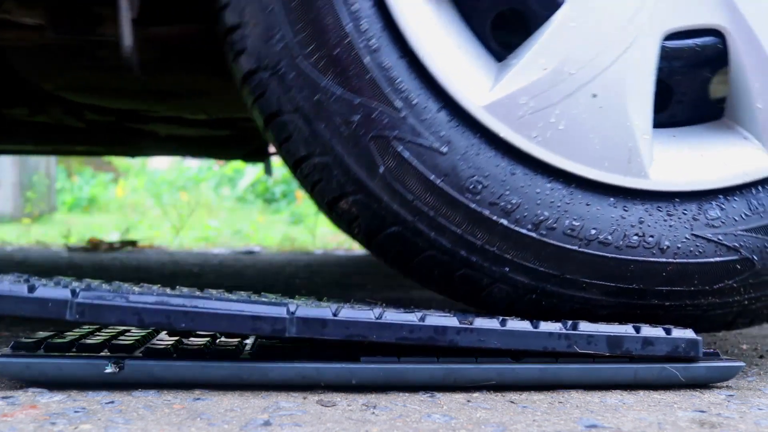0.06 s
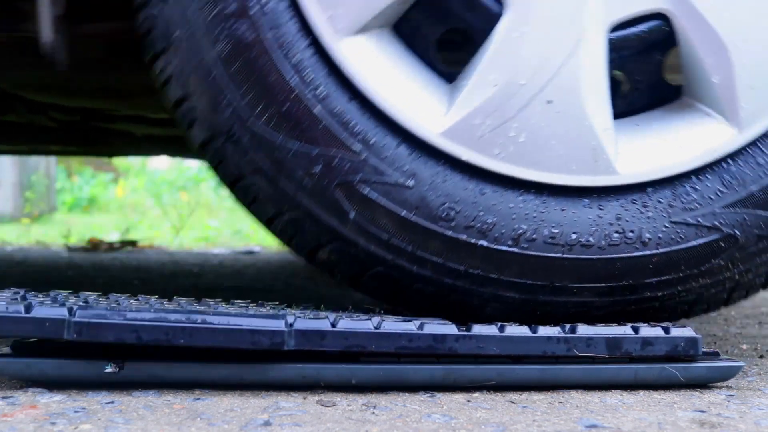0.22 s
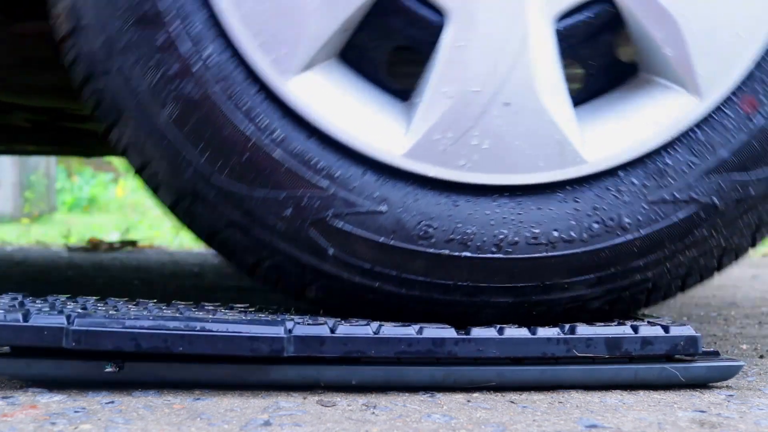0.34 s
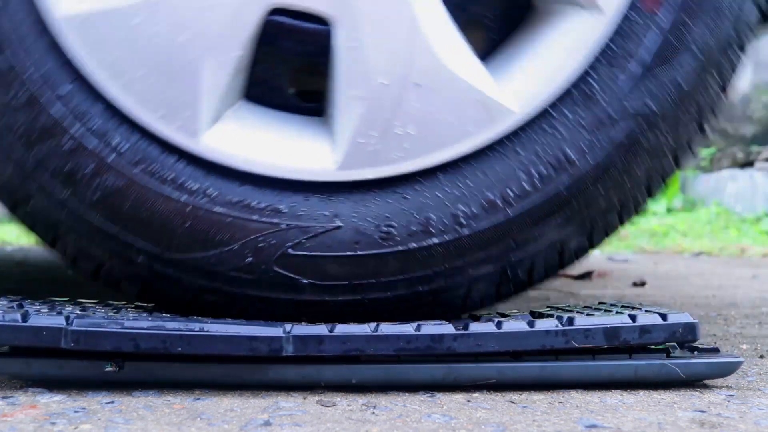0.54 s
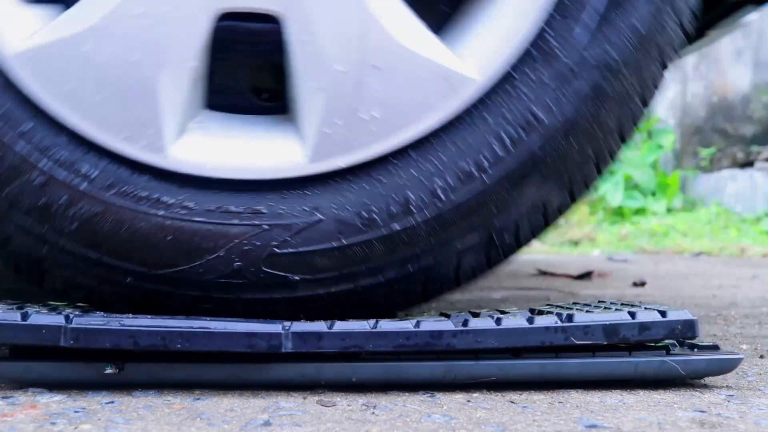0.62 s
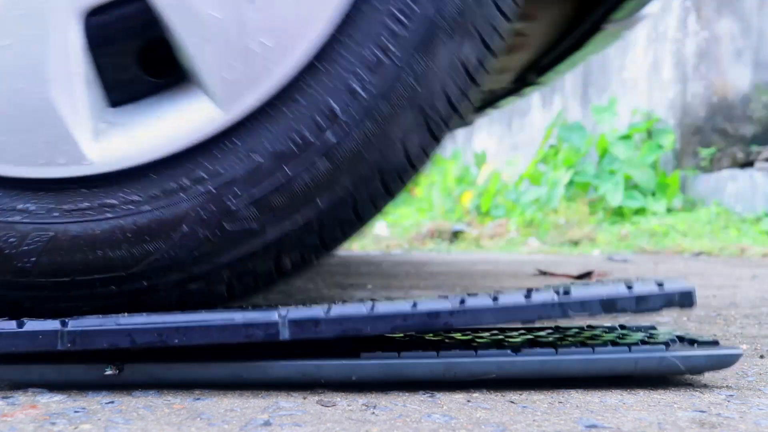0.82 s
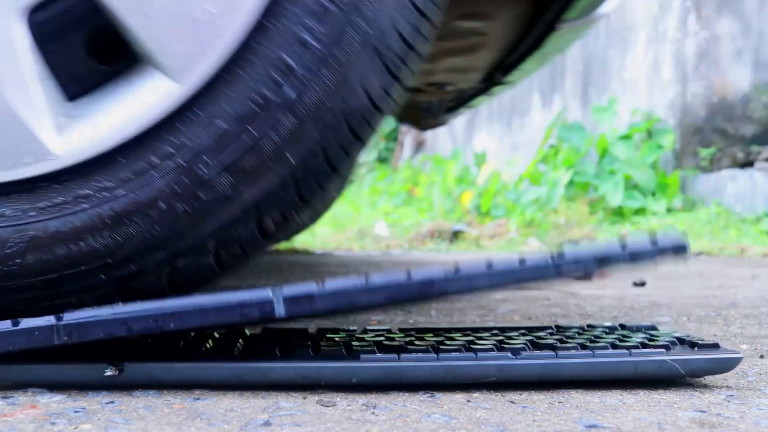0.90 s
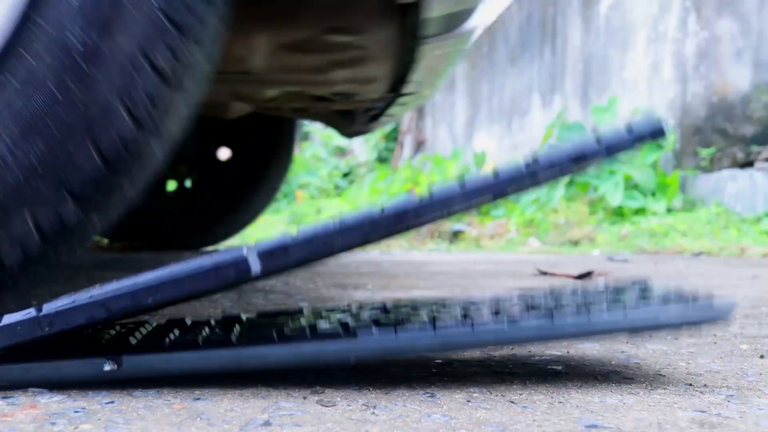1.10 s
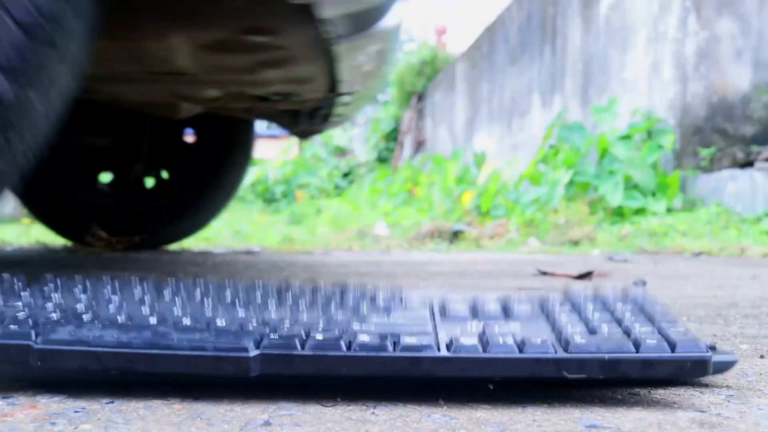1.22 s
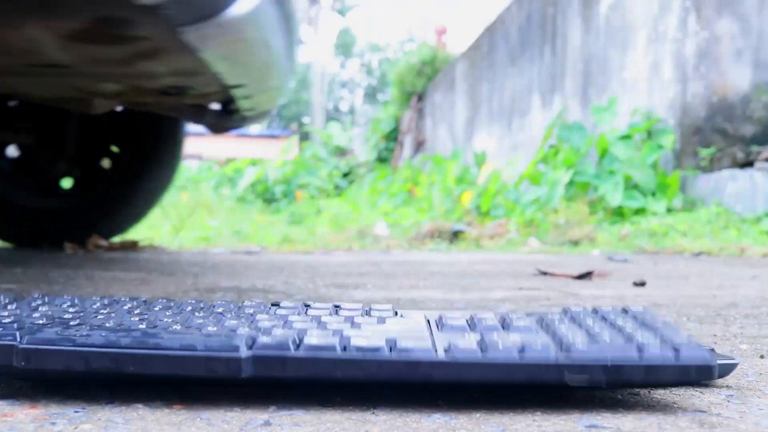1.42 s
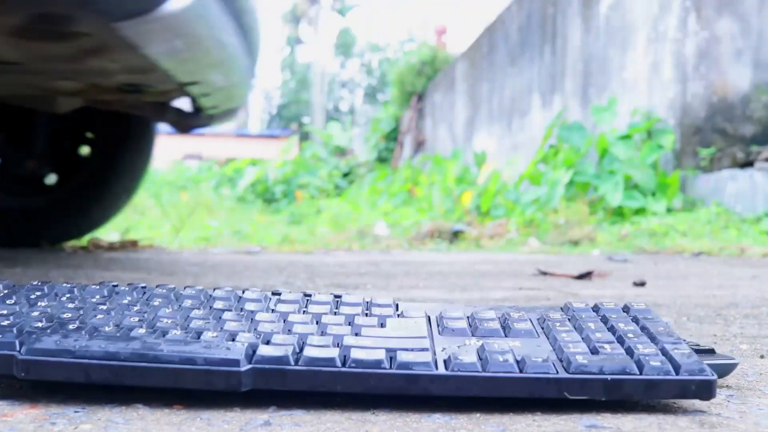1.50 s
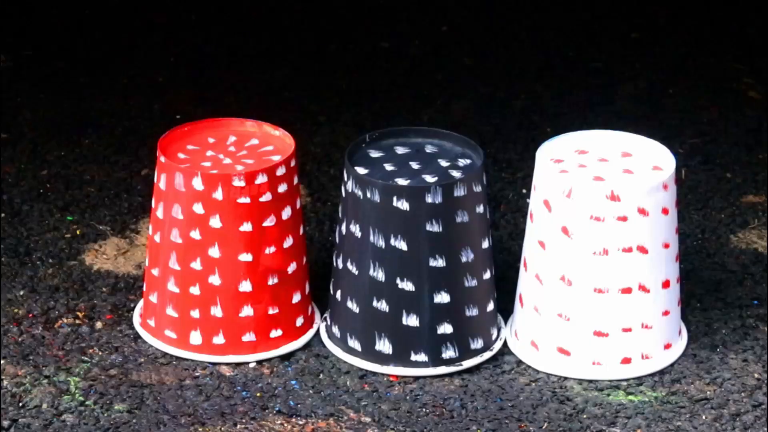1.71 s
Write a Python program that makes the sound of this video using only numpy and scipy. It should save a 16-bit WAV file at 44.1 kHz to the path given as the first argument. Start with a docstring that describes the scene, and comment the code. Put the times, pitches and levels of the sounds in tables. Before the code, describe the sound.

A plastic keyboard cracks under a car tyre, close by, over a low engine hum and rumble. Light ticks give way at about 0.2 seconds to sharp, dense snaps and fine crackle, lasting until 1.1 seconds. After a brief lull, the loose case slaps down around 1.3 seconds and rattles in weaker bounces until 1.6. A soft, dull bump follows near 1.7 seconds.

```python
"""Keyboard crushed under a tyre

A car rolls slowly over a plastic keyboard on concrete, close to the microphone. Keys and clips fracture
over a bed of fine crackle, each impulse exciting the damped modes of the case; the case lifts, slaps
back down and rattles. The engine hums underneath, and the underbody and yard reflect each crack.
The loudest cracks overload, and the sound drops out briefly near the end."""
import sys
import numpy as np
from scipy import signal
from scipy.fft import rfft, irfft
from scipy.io import wavfile
from scipy.ndimage import uniform_filter1d

SR = 44100
rng = np.random.default_rng(int(sys.argv[2]) if len(sys.argv) > 2 else 0)


def put_to_file(sound):
    """Save the sound as 16-bit audio at rate SR, in the file named by the first command-line argument."""
    columns = np.atleast_2d(sound).T  # one column per channel
    safe = np.clip(columns, -1, 1)
    whole_steps = np.round(safe * 32767)
    wavfile.write(sys.argv[1], SR, whole_steps.astype(np.int16))


N = 77175
T = np.arange(N) / SR

# fractures: (time [s], crack [dB], case knock [dB], bright edge [dB], pitch of the broken piece [Hz])
FRACTURES = [(0.0622, -33.5, -50, -31.5, 3600), (0.0798, -35.5, -46, -34, 3300),
             (0.1817, -26.5, -30.5, -26, 3200), (0.2111, -18, -30, -17, 3710),
             (0.2427, -25, -55, -26, 2950), (0.2686, -10, -23.5, -18, 2180), (0.2911, -5, -11, -17, 3260),
             (0.2988, -37, -17, -28, 3940), (0.3361, -15.5, -40, -17.5, 3500),
             (0.3422, -18, -41, -25, 3700), (0.3675, -12.5, -23, -18, 3500),
             (0.3888, -18, -30.0, -21, 3830), (0.396, -22, -27.0, -22.0, 2200),
             (0.4005, -11, -12, -15.5, 4030), (0.4615, -10, -10, -14, 1420),
             (0.4907, -8.5, -13.5, -11, 3620), (0.4955, -21.5, -26, -24, 3570),
             (0.5443, -28, -41, -26, 1900), (0.5735, -19, -29, -24.5, 1360),
             (0.5788, -17.5, -28, -15.5, 1790), (0.5837, -22, -30, -25, 1380),
             (0.5879, -18, -39.5, -24.5, 1400), (0.6046, -18.5, -38, -18, 3860),
             (0.6576, -24, -25.5, -19.5, 3220), (0.6638, -20, -49, -21.5, 3950),
             (0.6735, -14, -32.5, -10.5, 3350), (0.6868, -16.5, -30.5, -30, 1960),
             (0.6951, -26.5, -30, -25.0, 2100), (0.7089, -21, -43.0, -34, 2100),
             (0.7168, -9.5, -31, -15.5, 2100), (0.7287, -6, -27.5, -15, 2230),
             (0.7322, -14.5, -21.5, -17, 3920), (0.7698, -17.5, -36.5, -27, 4000),
             (0.7967, -12.5, -32.5, -18.5, 2650), (0.7993, -9.5, -21, -10, 2900),
             (0.8068, -12.5, -18, -30, 2650), (0.8095, -14, -29, -20, 2730),
             (0.8147, -14.5, -27, -21, 1400), (0.8198, -28, -23, -15, 2200), (0.8247, -13, -36, -33, 3960),
             (0.8317, -19, -36, -34, 1550), (0.8431, -17.5, -24.5, -17.5, 1920),
             (0.866, -12, -15, -12, 3700), (0.8759, -6, -29, -12, 3010), (0.8789, -12.5, -22.5, -24, 4020),
             (0.9232, -8, -12, -9, 2840), (0.9275, -5.5, -8, -15.5, 1440), (0.9348, -12, -24.5, -14, 2750),
             (0.9876, -23.5, -27.5, -20, 3140), (0.9996, -22, -26, -14.5, 3620),
             (1.0073, -17.0, -24, -18, 3300), (1.0348, -12, -16, -17, 3140),
             (1.0504, -7, -12.5, -10.5, 3500), (1.0761, -18, -15, -18.5, 2170),
             (1.0871, -11, -14, -15.5, 3300), (1.1733, -28, -54, -26.5, 3400),
             (1.1796, -25.5, -57.5, -30.5, 3040)]
# impacts of the loose case on its base and the ground: (time [s], clack [dB], case knock [dB],
# bright edge [dB], panel pitch [Hz], panel level [dB], rim pitch [Hz], rim level [dB])
LANDINGS = [(1.089, -15, -19, -13, 447, -14, 890, -20), (1.099, -21, -25.5, -32, 536, -19.5, 2680, -22),
            (1.278, -29, -19.5, -52, 1230, -20.5, 2720, -47),
            (1.2841, -9, -8, -19.5, 970, -14, 2504, -14.5), (1.291, -16, -19, -24, 450, -28, 1640, -18),
            (1.3311, -11.5, -28, -13.5, 1300, -23, 3200, -29),
            (1.3359, -16, -11, -23.5, 1310, -8.5, 2660, -21),
            (1.3395, -12.5, -15.5, -34, 893, -12, 1550, -18), (1.389, -36, -31, -46, 1180, -32, 2360, -37),
            (1.4036, -28.5, -28, -50, 1160, -26, 2420, -39),
            (1.454, -18.5, -21, -28.5, 490, -24, 1204, -26.5), (1.4927, -20, -23, -27, 487, -34, 1220, -27),
            (1.563, -33.5, -38.5, -58, 510, -49, 1205, -33.5)]
# low and high modes of the case: (frequency [Hz], level [dB])
KNOCK_MODES = [(285, -25.5), (452, -7.5), (560, -7), (680, -10.5), (800, -4), (900, 1.5), (1065, 1.5),
               (1250, 2)]
CLACK_MODES = [(1430, -2.5), (1700, -5), (2130, 0), (2450, 3), (2790, 0), (3250, 1), (3620, 1), (3950, 2),
               (4220, -1.5)]
# bright edge of a blow: (frequency [Hz], level [dB])
EDGE_SPECTRUM = [(3000, -20), (4400, -14.5), (5400, -2), (7600, 0.5), (12000, -9), (16000, -27)]
# crackle under the load of the tyre: (time [s], level [dB])
CRACKLE_LEVEL = [(0, -40.5), (.16, -39.5), (.39, -30.5), (.44, -35.5), (.53, -34.5), (.63, -36), (.72, -42),
                 (.78, -35.5), (.83, -25), (.91, -30), (1.02, -24.5), (1.11, -34.5), (1.18, -31),
                 (1.23, -55.5), (1.37, -53), (1.52, -41.5), (1.62, -59)]
# bearing of the tyre: (time [s], left minus right [dB])
TYRE_PAN = [(0, -11), (.3, -4), (.8, -2), (1.5, -2.5)]
# engine harmonics: (multiple of the firing rate [1], level [dB])
ENGINE_ORDERS = [(1, -52.5), (2, -41), (3, -48), (4, -48.5), (5, -58), (6, -48), (7, -46.5), (12, -51),
                 (15, -47.5)]
# envelopes of the engine and the rolling rumble: (time [s], level [dB])
ENGINE_LEVEL = [(0, 0), (.1, 2), (.28, 0), (.42, -17), (1.1, -9.5), (1.42, -6), (1.69, -13.5)]
RUMBLE_LEVEL = [(0, -38), (.2, -38.5), (.7, -37.5), (1.1, -35.5), (1.24, -39.5), (1.68, -42), (1.75, -54)]
# exhaust puff, rolling rumble and ground bump: (frequency [Hz], level [dB])
PUFF_SPECTRUM = [(50, -15), (300, -11.5), (620, 0.5), (800, -7.5), (2500, -25), (12000, -31.5)]
RUMBLE_SPECTRUM = [(20, -9.5), (45, 0.5), (75, 3), (140, -1), (290, -1.5), (420, -13), (700, -9.5),
                   (1500, -12), (4000, -26.5), (15000, -48)]
BUMP_SPECTRUM = [(25, -9), (70, -1.5), (190, -1.5), (320, -1.5), (520, -17.5), (2000, -60)]
# bumps of tyre and case on the ground: (time [s], width [s], level [dB], left minus right [dB])
BUMPS = [(0.733, 0.01, -31, 3), (1.29, 0.0015, -20, 8), (1.619, 0.025, -40.5, 18.5),
         (1.671, 0.011, -29.5, 16.5)]
# colour of the reflections: (frequency [Hz], level [dB])
ECHO_SPECTRUM = [(200, -3.5), (1000, 2), (3500, 2.5), (8000, 0), (15000, -0.5)]
# stereo width: (frequency [Hz], side relative to mid [dB])
SIDE_SPECTRUM = [(50, 0.5), (120, -9.5), (250, -14.5), (550, -16.5), (1000, -12), (2200, -5.5), (3800, -3),
                 (7500, 2.5), (14000, 0.5)]

BLOW_SAMPLES, SLIPS_PER_S = 8192, 6000
SNAP_S, SLAP_S = .00022, .0007   # time scale on which the slips of one blow swell and die
CRACK_TRIM_DB, KNOCK_TRIM_DB, EDGE_TRIM_DB = 0.5, 1.5, -1.5   # added to each fracture
PIECE_SHARE = .47   # share of a crack's energy in the broken piece
PIECE_T60_S, PANEL_T60_S = .0032, .024
KNOCK_CYCLES, CLACK_CYCLES = 12, 20   # cycles in which a mode dies by 60 dB
TYRE_DAMPING = .55   # share of the ring time left under the tyre
MODE_SCATTER_DB, MODE_DETUNE = 3, 0.012   # spread from blow to blow as the case bends
GRAINS_PER_S, GRAIN_SPREAD_DB = 780, 3.5
FIRING_HZ, FIRING_WAVER, PUFF_DB = 41.28, 0.006, -45
ECHO_DELAY_S, SIDE_LAG_S = 0.0024, .00007
DROPOUT_FROM_S, DROPOUT_TO_S, CUTOFF_HZ = 1.695, 1.737, 16600


def snaps():
    """Brittle fracture: the released energy rings the broken piece and the tyre-damped case."""
    out, jolt = np.zeros((2, N)), impulse(SNAP_S)
    for time, crack_db, knock_db, edge_db, hz in FRACTURES:
        slips = slip_burst(SNAP_S, tail_s=.0045, tail_db=-10)   # splinters rattle on
        crack_db += CRACK_TRIM_DB
        piece = unit(resonator(resonator(jolt, hz, PIECE_T60_S), hz, PIECE_T60_S))
        piece *= from_db(crack_db) * np.sqrt(PIECE_SHARE)
        clack_db = crack_db + 10 * np.log10(1 - PIECE_SHARE)
        case = case_response(slips, clack_db, knock_db + KNOCK_TRIM_DB, edge_db + EDGE_TRIM_DB,
                             TYRE_DAMPING)
        place(out, time, piece + case)
    return out


def slaps():
    """Impact excitation: the freed case lands and bounces, and its panel and rim vibrate freely."""
    out, jolt = np.zeros((2, N)), impulse(2 * SLAP_S)
    for time, clack_db, knock_db, edge_db, panel_hz, panel_db, rim_hz, rim_db in LANDINGS:
        panel = from_db(panel_db) * unit(resonator(jolt, panel_hz, PANEL_T60_S))
        rim = from_db(rim_db) * unit(resonator(jolt, rim_hz, PANEL_T60_S))
        slips = slip_burst(SLAP_S, tail_s=0.011, tail_db=-6.5)   # loose keys rattle on
        place(out, time, panel + rim + case_response(slips, clack_db, knock_db, edge_db))
    return out


def crackle():
    """Shot noise: grinding keys and grit send small random ticks through the damped case."""
    sizes = from_db(GRAIN_SPREAD_DB * np.minimum(rng.exponential(1, N), 3))
    ticks = stereo(rng.standard_normal((2, N)) * sizes * (rng.random(N) < GRAINS_PER_S / SR))
    grinding = case_response(ticks, clack_db=0, knock_db=-1.5, edge_db=-3, damping=TYRE_DAMPING)
    return unit(grinding) * np.sqrt(N) * from_db(curve(CRACKLE_LEVEL))


def slip_burst(swell_s, tail_s, tail_db):
    """Stick-slip excitation: a run of tiny slips swells, collapses and trails off."""
    t = T[:BLOW_SAMPLES]
    rise = t / (2 * swell_s)
    swell = (rise * np.exp(1 - rise)) ** 2
    tail = from_db(tail_db) * np.minimum(rise, 1) * np.exp(-t / tail_s)
    slips = rng.standard_normal((2, BLOW_SAMPLES))
    slips *= (rng.random(BLOW_SAMPLES) < SLIPS_PER_S / SR) + 0.3   # spikes over a noise floor
    return stereo(np.array([unit(channel) for channel in slips * (swell + tail)]))


def impulse(delay_s):
    """Impulse excitation: one clean jolt, its side signal slightly behind its mid."""
    pair = np.zeros((2, BLOW_SAMPLES))
    pair[0, int(delay_s * SR)] = pair[1, int((delay_s + SIDE_LAG_S) * SR)] = 1
    return stereo(pair)


def case_response(force, clack_db, knock_db, edge_db, damping=1):
    """Forced vibration: the case answers with high modes, low modes and a bright edge."""
    clack = from_db(clack_db) * modal_sum(force, CLACK_MODES, CLACK_CYCLES * damping)
    knock = from_db(knock_db) * modal_sum(force, KNOCK_MODES, KNOCK_CYCLES * damping)
    edge = from_db(edge_db) * unit(colour(force, EDGE_SPECTRUM))
    return clack + knock + edge


def modal_sum(force, modes, cycles):
    """Modal superposition: each blow lands elsewhere, so the modes vary in strength and tuning."""
    total = 0
    for k, (hz, db) in enumerate(modes):
        strength, tuning = rng.standard_normal(2)
        mode = unit(resonator(force, hz * (1 + MODE_DETUNE * tuning), t60=cycles / hz))
        total += (-1) ** k * from_db(db + MODE_SCATTER_DB * strength) * mode
    return unit(total)


def resonator(force, hz, t60):
    """Damped harmonic oscillator: one mode that falls by 60 dB in t60 seconds."""
    radius, angle = from_db(-60 / (t60 * SR)), 2 * np.pi * hz / SR
    return signal.lfilter([1, 0, -1], [1, -2 * radius * np.cos(angle), radius ** 2], force + 1e-18)


def place(out, time, blow):
    """Superposition: add a blow at the tyre's bearing, its level taken over 5 ms."""
    start = int(time * SR)
    span = out[:, start:start + BLOW_SAMPLES]
    span += (blow * np.sqrt(.005 * SR) * panned(curve(TYRE_PAN, time)))[:, :span.shape[1]]


def engine():
    """Periodic excitation: firing pulses give a harmonic throb, with an exhaust puff on each."""
    waver = np.interp(T, np.linspace(0, T[-1], 14), rng.standard_normal(14))
    phase = 2 * np.pi * np.cumsum(FIRING_HZ * (1 + FIRING_WAVER * waver)) / SR
    hum = sum(from_db(db) * np.sqrt(2) * np.cos(order * (phase - np.pi) + .5 * rng.standard_normal((2, 1)))
              for order, db in ENGINE_ORDERS)
    puffs = from_db(PUFF_DB) * noise(PUFF_SPECTRUM) * (1 - np.cos(phase))
    return (hum + puffs) * from_db(curve(ENGINE_LEVEL))


def car():
    """Contact noise: rolling rumble and a few dull bumps on the ground join the engine."""
    running = engine() + noise(RUMBLE_SPECTRUM) * from_db(curve(RUMBLE_LEVEL))
    bump_envelope = sum(from_db(db) * np.exp(-.5 * ((T - time) / width) ** 2) * panned(pan_db)
                        for time, width, db, pan_db in BUMPS)
    return running * panned(db=0.5) + bump_envelope * noise(BUMP_SPECTRUM)


def reflections(direct, t60, db):
    """Reverberation: dense reflections arrive after a short delay and decay exponentially."""
    t = T[:SR // 2]
    tail = stereo(rng.standard_normal((2, len(t)))) * from_db(-60 * t / t60) * (t > ECHO_DELAY_S)
    response = colour(unit(tail), ECHO_SPECTRUM)
    return from_db(db) * signal.fftconvolve(direct, response, axes=-1)[:, :N]


def noise(spectrum):
    """Spectral shaping: coloured stereo noise of rms 1."""
    return unit(colour(stereo(rng.standard_normal((2, N))), spectrum)) * np.sqrt(N)


def colour(x, spectrum):
    """Minimum-phase filtering: a folded cepstrum gives a causal response with this spectrum."""
    hz, db = np.transpose(spectrum)
    grid_hz = np.fft.rfftfreq(4096, 1 / SR)
    gains = from_db(np.interp(np.log(grid_hz + 1), np.log(hz), db))
    cepstrum = irfft(np.log(gains))
    cepstrum[1:2048] *= 2
    cepstrum[2049:] = 0
    response = irfft(np.exp(rfft(cepstrum)))
    return signal.fftconvolve(x, response[None], axes=-1)[:, :x.shape[-1]]


def stereo(pair):
    """Mid-side mixing: narrow in the middle range, wide in the treble and deep bass."""
    mid, side = pair[0], colour(pair[1:], SIDE_SPECTRUM)[0]
    return np.array([mid + side, mid - side])


def panned(db):
    """Level-difference panning: left and right gains, db apart."""
    return from_db(np.array([[db], [-db]]) / 2)


def curve(rows, t=T):
    """Linear interpolation between (time [s], value) points."""
    return np.interp(t, *np.transpose(rows))


def unit(x):
    """Normalisation to a mean energy of 1 per channel."""
    return x / np.sqrt(np.mean(np.sum(x ** 2, axis=-1)) + 1e-20)


def from_db(db):
    """Amplitude ratio of a level in decibels."""
    return 10 ** (np.asarray(db) / 20)


def scene():
    """Superposition of the keyboard, its reflections and the car."""
    keyboard = snaps() + slaps() + crackle()
    underbody = reflections(keyboard, t60=0.067, db=-14)
    yard = reflections(keyboard, t60=0.24, db=-16.5)
    return keyboard + underbody + yard + car()


def record(dry):
    """Saturation and band limiting: peaks flatten, the sound drops out briefly, the top is cut."""
    gate = uniform_filter1d(1. * ((T < DROPOUT_FROM_S) | (T > DROPOUT_TO_S)), size=60)
    saturated = dry / (1 + dry ** 4) ** .25
    lowpass = signal.cheby2(14, 45, CUTOFF_HZ, fs=SR, output="sos")
    return signal.sosfiltfilt(lowpass, saturated * gate)


dry = scene()
out = record(dry)
put_to_file(out)
```